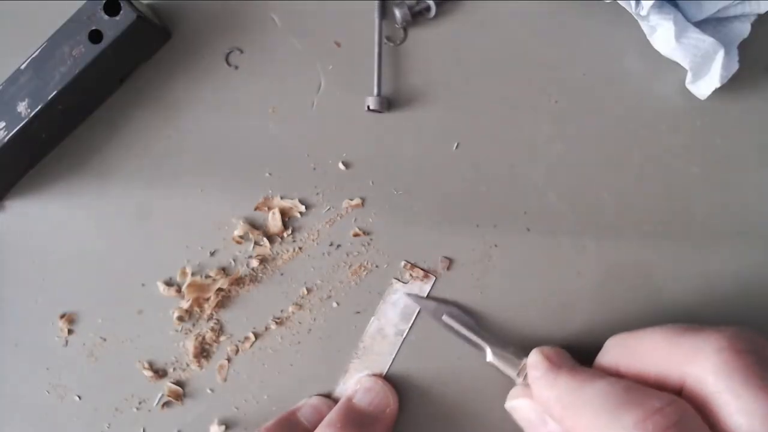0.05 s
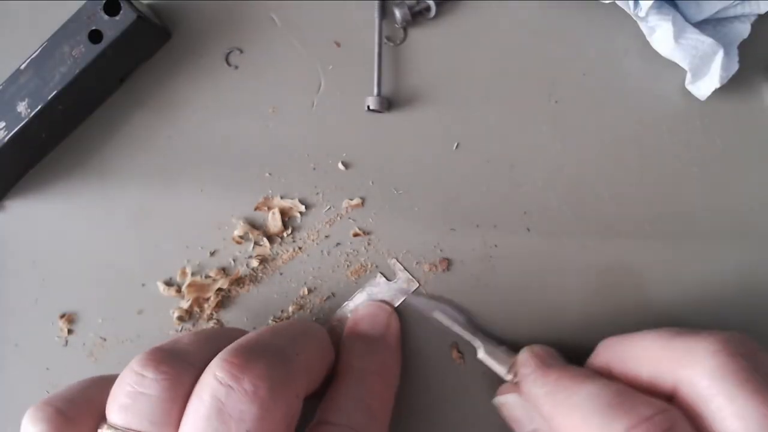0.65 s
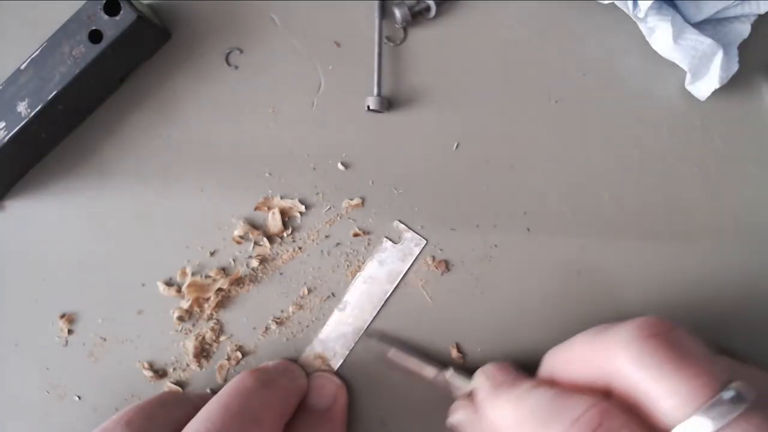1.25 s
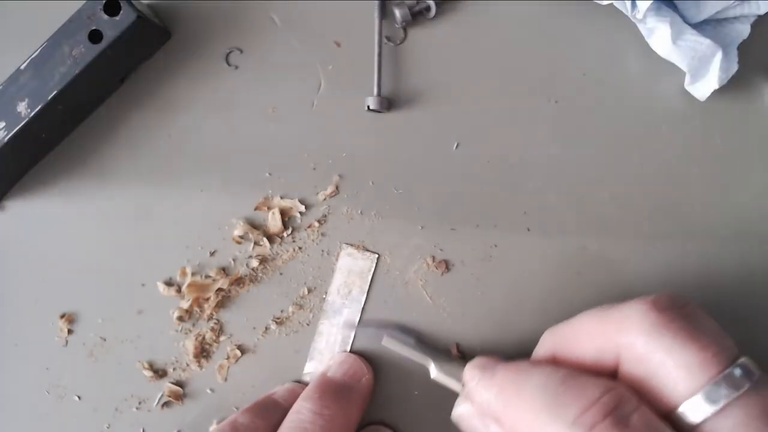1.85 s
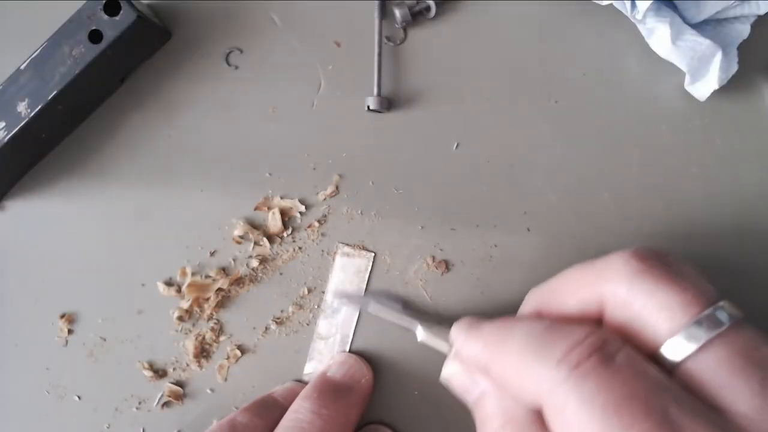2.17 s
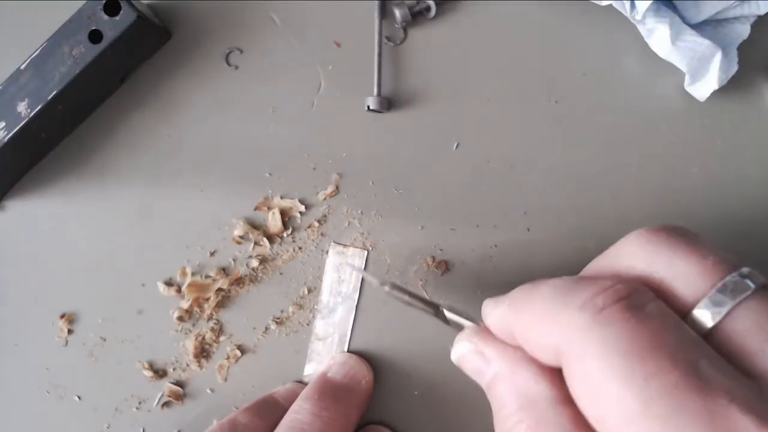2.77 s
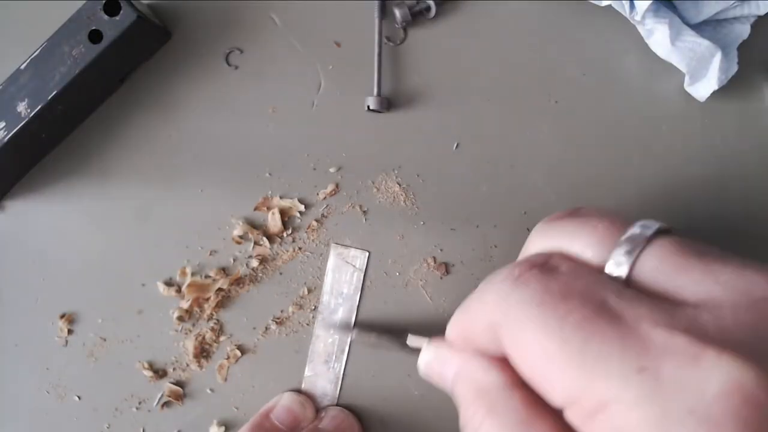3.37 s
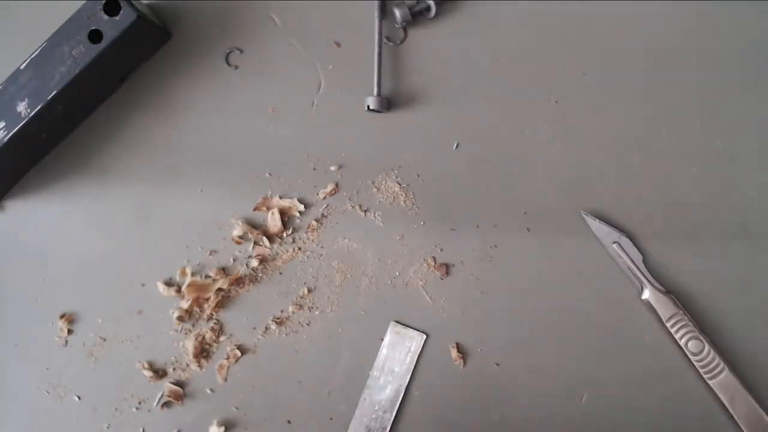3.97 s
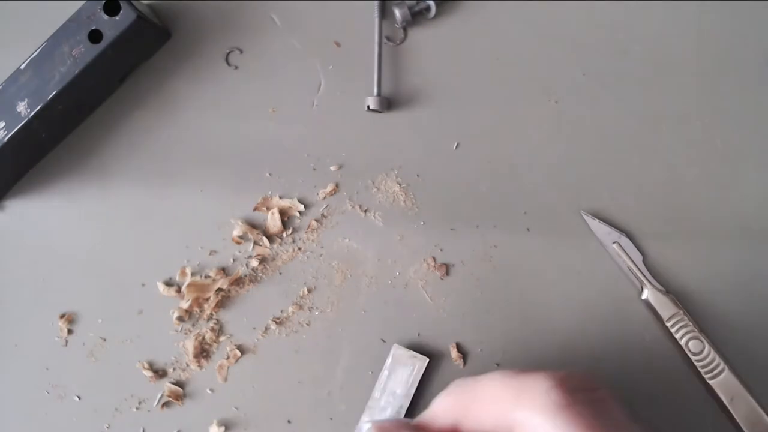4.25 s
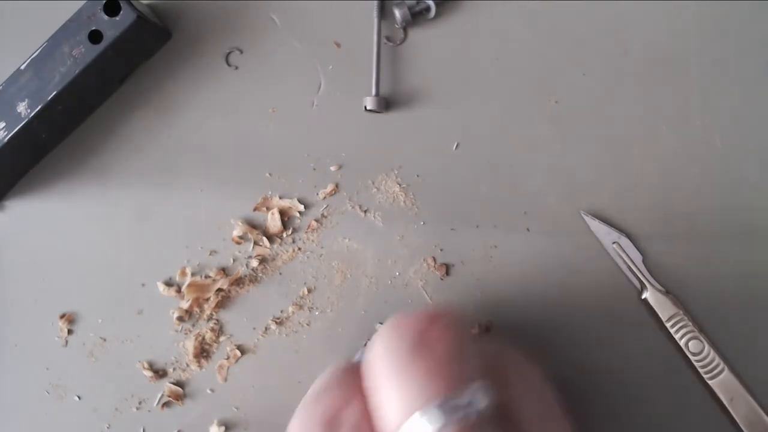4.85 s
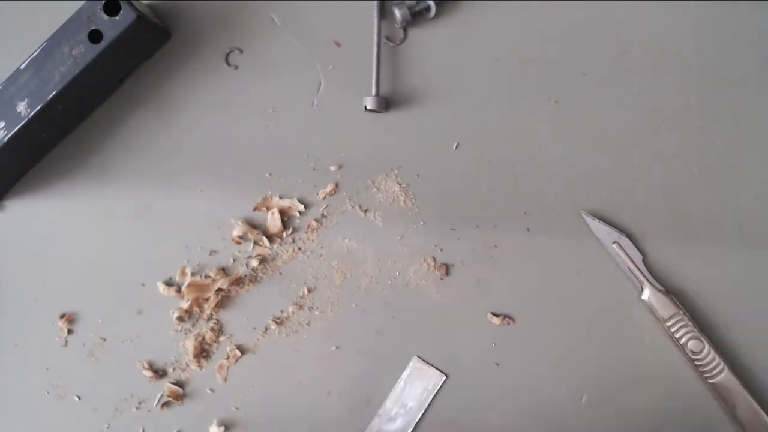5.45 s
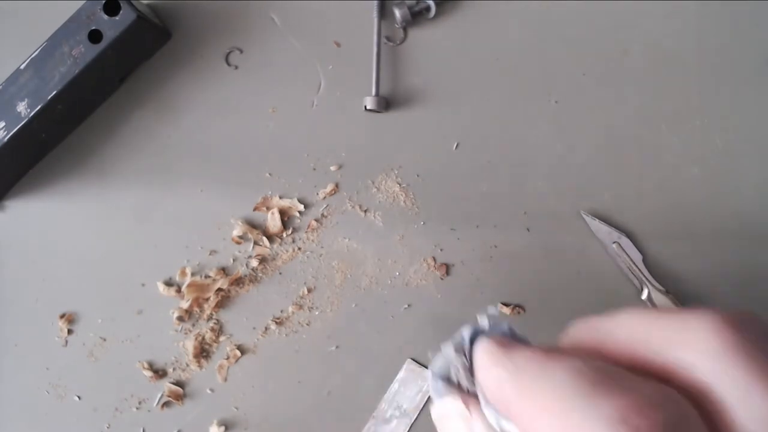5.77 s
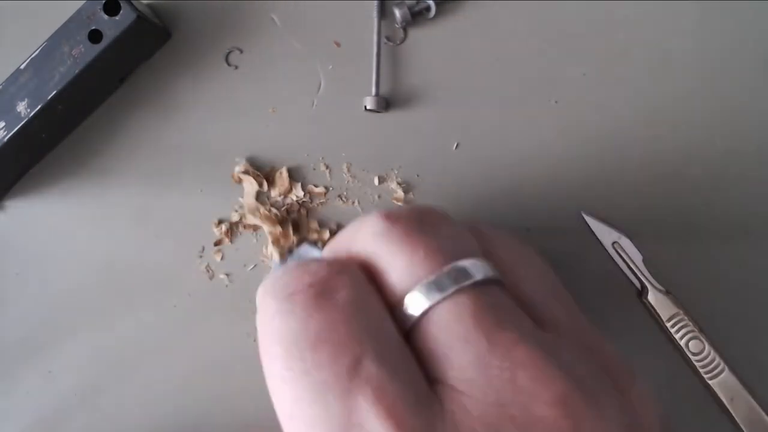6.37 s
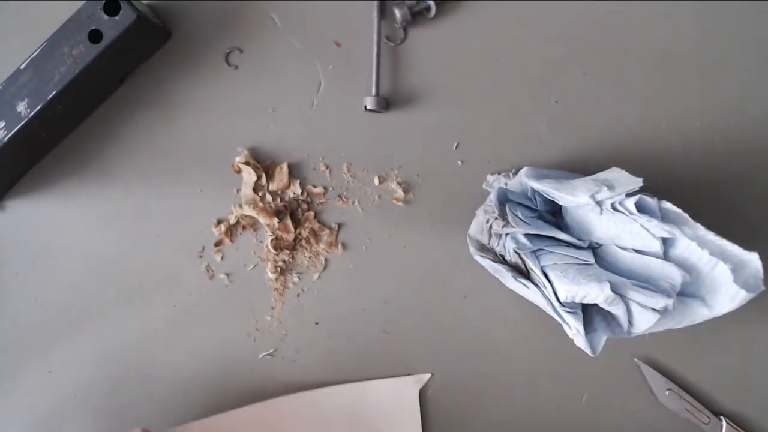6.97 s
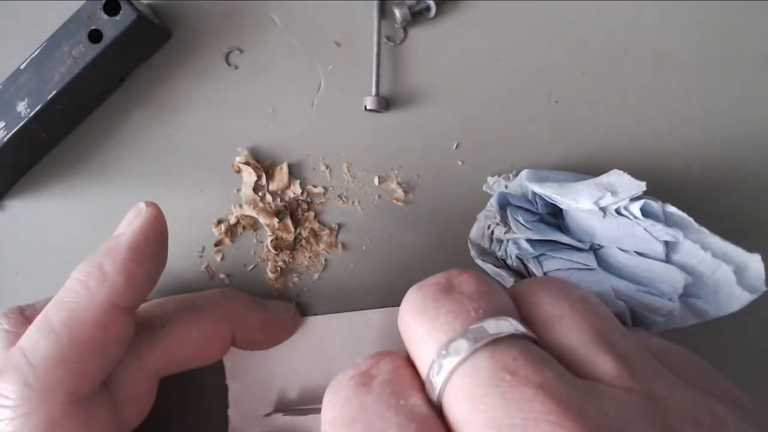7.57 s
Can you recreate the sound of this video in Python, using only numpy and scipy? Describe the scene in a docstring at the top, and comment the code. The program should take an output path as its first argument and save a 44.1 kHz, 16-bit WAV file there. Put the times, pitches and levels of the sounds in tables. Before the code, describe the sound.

A scalpel scrapes and picks at a thin metal strip, metal clatters down, then a paper towel rubs and wipes a bench.

```python
"""Quick bench work, close up in a dry room, hurried as in fast motion.
First a scalpel picks and scrapes a label off a thin metal strip: gritty friction, ticks as the tip snaps free.
Near 3.9 s the scalpel clatters down, at 4.2 s the strip; the bench damps their ring at once.
From 4.4 s a paper towel rubs the strip and sweeps up the shavings. Hands bump the bench throughout."""
import sys
import numpy as np
from scipy import signal
from scipy.io import wavfile
from scipy.ndimage import map_coordinates

SR = 44100
rng = np.random.default_rng(int(sys.argv[2]) if len(sys.argv) > 2 else 0)


def master(y):
    """Save y as 16-bit WAV."""
    cut = np.clip(np.atleast_2d(y).T, -1, 1)
    pcm = np.round(cut * 32767)  # scale
    wavfile.write(sys.argv[1], SR, pcm.astype(np.int16))


N = 340011
TIME_S = np.arange(N) / SR
SHEEN_HZ, CUTOFF_HZ = 8000, 16100  # noise is "body" below SHEEN_HZ, "sheen" above

# Evenly paced strokes; table levels are relative throughout. Each row: first and last stroke in seconds,
# stroke count, start, middle and end level in dB, sheen offset in dB, stroke length in seconds,
# drag offset in dB, bench push in dB.
BLADE_SCRAPE_RUNS = [ (0.0767, .131, 3, -48, -49.5, -46, 3, 0.003, -65, -69),
                     (0.391, .481, 4, -58, -57, -58.5, 3.5, 0.0027, -59, -46.5),
                     (0.682, 0.782, 5, -66, -50.5, -57.5, 4, 0.003, -59, -93),
                     (0.803, 0.931, 7, -47, -50.5, -58.5, 4, .0024, -56, -88),
                     (1.042, 1.345, 14, -54, -41, -45, -5, 0.0053, -10.5, -57.5),
                     (1.617, 1.682, 4, -56.5, -82, -61, -3, 0.018, -20, -59),
                     (1.87, 1.943, 4, -66.5, -53, -57, 1, 0.0039, -20, -78),
                     (1.998, 2.282, 13, -59, -51, -62, 2, 0.0054, -16, -66),
                     (2.354, 2.422, 4, -86, -52.5, -52, 0.5, 0.0019, -61, -79),
                     (2.485, 2.688, 10, -54.5, -55, -54, -0.5, 0.0074, -30, -81),
                     (2.9252, 2.984, 3, -47, -40, -43.5, 1, 0.0051, -50, -65),
                     (3.004, 3.106, 6, -42.5, -45.5, -47, 3.5, 0.0034, -40, -54),
                     (3.206, 3.33, 5, -70, -61, -52, 2.5, 0.0037, -44, -72.5),
                     (3.414, 3.488, 3, -44.5, -45.5, -44.5, -2.5, 0.0071, -48.5, -67),
                     (3.651, 3.838, 6, -48.5, -43.5, -42.5, -1, 0.0076, -59, -75),
                     (3.998, 4.174, 10, -53, -53, -49.5, -0.5, 0.0093, -23, -68.5)]
PAPER_RUB_RUNS = [ (4.393, 4.658, 19, -49, -43.5, -46.5, -0.5, 0.0051, -19, -38),
                  (4.914, 5.163, 20, -50.5, -45.5, -50, -1, 0.0045, -18.5, -38),
                  (5.173, 5.261, 8, -51.5, -61, -61.5, 6, 0.0023, -27, -69),
                  (5.624, 5.868, 17, -49.5, -46.5, -49, 1.5, 0.005, -20, -51)]
# Lone strokes. Each row: middle in seconds, level in dB, sheen offset in dB, length in seconds.
LONE_SCRAPES = [(.02, -57, -3, 0.0022), (.0535, -68, 3, 0.0017), (.1846, -64, 22, 0.0025),
                (.27, -72, 9, .0025), (.315, -64, 9, .004), (.6297, -61, -4, 0.01),
                (1.468, -63, -0.5, .0016), (1.765, -65, -7, 0.0018), (2.7577, -68.5, 14.5, 0.0014),
                (2.7807, -59, 8, 0.0014), (2.8444, -52, 3, 0.0017), (3.5179, -51, 6.5, 0.0084),
                (3.5432, -51, 6.5, 0.0051), (3.8815, -48, 7, 0.002), (3.9375, -53.5, 6, 0.0058),
                (4.199, -62.5, 11, 0.008), (4.288, -50, 1, 0.0078), (4.3431, -49, -3.5, 0.0039)]
LONE_WIPES = [(4.81, -66, 2.5, 0.008), (5.3494, -53, 3, 0.0066), (5.3894, -45.5, 3, 0.0066),
              (5.4479, -53, 3, 0.0019), (5.5203, -60.5, 1, 0.0083), (5.9484, -57.5, -4, 0.0049),
              (5.9791, -64, 2, .002), (6.0335, -48, -11, 0.0014), (6.1339, -59, 4, 0.0038),
              (6.064, -52, -1.5, 0.01), (6.1578, -57, 1.5, 0.014), (6.2158, -52.5, -2, 0.013),
              (6.2874, -59, -1, 0.011), (6.3717, -60.5, -2, .01), (6.4344, -62.5, -2, 0.0088),
              (6.4877, -61.5, -0.5, 0.013), (6.6006, -49.5, 0, 0.0017), (6.6326, -55, -2.5, 0.012),
              (6.8916, -56.5, 4.5, 0.0048), (6.9491, -64.5, 0, 0.015), (7.025, -68, 6.5, .0028),
              (7.33, -69.5, -4, 0.012)]
# Hard contacts. Each row: start in seconds, level in dB, sheen offset in dB.
SHARP_TICKS = [(.1649, -44.5, -2), (.1947, -34, 10.5), (.2585, -53.5, -3), (.4491, -46.5, 5),
               (.5905, -46.5, 11), (.7548, -56.5, 22.5), (.8007, -52.5, 14.5), (.8293, -47, 0),
               (.845, -52, 5), (.888, -55, 19), (1.0267, -51.5, 5), (1.3184, -37, -3), (1.3442, -39.5, 2),
               (1.3643, -46.5, 2.5), (1.6252, -48.5, 12), (1.9191, -49.5, 4), (2.5285, -42, 5),
               (2.9568, -41, 3), (3.0033, -43, 11), (3.0456, -50, 4), (3.0844, -53, 12), (3.1035, -35, 1),
               (3.2024, -46, 2), (3.3265, -60.5, 15.5), (4.7756, -50.5, -12.5), (5.6116, -49, -6),
               (5.7178, -46, -5), (5.7463, -46, 9.5), (6.8845, -72.5, -5), (7.2025, -69, -22),
               (7.274, -56.5, 4.5)]
STRIP_KNOCKS = [(.1947, -41, 4.5), (1.6024, -36, 3.5)]
SCALPEL_HITS = [(.5414, -41, 0.5), (3.8828, -35, 3), (3.8928, -31, -19), (3.8948, -26, 2.5)]
STRIP_HITS = [(4.2032, -34.5, 20), (4.2065, -23.5, 6.5), (4.2094, -23.5, -20), (4.2703, -44.5, 13.5),
              (4.2736, -32.5, 6.5)]
# A hand lands or shifts on the bench. Each row: time in seconds, jostle length in seconds, level in dB.
HAND_BUMPS = [(0.326, 0.00017, -49), (.44, .068, -47), (1.335, .045, -54), (1.605, 0.00017, -50),
              (1.742, 0.002, -53), (1.983, 0.00075, -46), (2.224, 0.00022, -51.5), (2.434, .03, -36),
              (2.659, .026, -34), (2.742, .013, -36.5), (3.069, .036, -39.5), (3.145, 0.00037, -41),
              (3.188, 0, -44), (3.27, 0, -49.5), (3.512, .03, -44), (3.78, .036, -47), (4.293, .034, -51.5),
              (5.35, 0.00055, -37.5), (5.385, 0, -35.5), (5.417, 0.00091, -39), (5.478, 0.002, -40),
              (5.533, .03, -40.5), (5.616, 0, -41.5), (6.049, 0.0057, -39.5), (6.119, .014, -41.5),
              (6.197, 0, -46), (6.258, 0.009, -40.5), (6.293, 0, -46), (6.436, 0.0055, -43.5),
              (6.559, .078, -50.5), (6.776, .013, -40), (6.841, .02, -48.5), (7.246, 0.00059, -48),
              (7.423, 0.0076, -54.5), (7.685, 0.0048, -46)]
# Finger activity curve. Each row: time in seconds, rustle level in dB, nudge level in dB.
FIDGET_CURVE = [(0, -73.5, -80), (0.221, -76, -80.5), (.5, -77, -50), (.66, -88.5, -78),
                (1.101, -94.5, -65), (1.53, -88.5, -75.5), (1.8, -87.5, -57.5), (2.15, -77.5, -58),
                (2.7, -66.5, -60), (2.9, -93, -59), (3.6, -97, -71), (4.299, -85, -64), (4.74, -84.5, -63),
                (5.25, -74, -60.5), (5.899, -82, -58.5), (6.55, -69.5, -55.5), (6.72, -93.5, -55),
                (7.7, -95.5, -59.5)]
# Struck modes. Each row: frequency in Hz, level in dB, T60 in seconds.
SCALPEL_RING_MODES = [(1154, -15.5, 0.041), (1884, -11, 0.015), (2950, -10, 0.0091), (3430, -26, 0.016),
                      (4630, -1.5, 0.0156), (5170, -7, 0.01), (15540, -6, 0.0186), (14900, -24.5, .017)]
STRIP_RING_MODES = [(1964, -20.5, .018), (2160, -12.5, .017), (5070, -19.5, 0.011), (5400, -23.5, 0.016),
                    (6912, 1.5, 0.023), (8200, -14, 0.028), (7600, -13.5, 0.017), (10550, -13, .022),
                    (10200, -9, 0.014), (9800, -18, .02)]
BENCH_THUD_MODES = [(67, -1, 0.038), (107, -8.5, 0.039), (182, -9.5, 0.033), (288, -19, 0.034),
                    (350.4, -24.5, 0.02), (450, -25.5, 0.054), (1180, -35, 0.035)]
# Resonances of the working blade. Each row: centre in Hz, width in Hz, gain in dB.
BLADE_PEAKS = [(4530, 150, -6.5), (5730, 330, -12), (7230, 1900, -5.5), (10660, 350, 6.5),
               (13200, 410, -3.5)]
# Noise spectra. Each row: frequency in Hz, spectral density in dB.
BLADE_SPECTRUM = [(60, -1), (150, 6), (400, -0.5), (800, 0), (1600, 2.5), (2600, 0.5), (3800, 4.5),
                  (4800, 5), (7000, -1), (9300, -4), (11000, -5.5), (13000, 1), (15800, -3)]
PAPER_SPECTRUM = [(60, 9.5), (200, 4.5), (650, -4.5), (1150, 1.5), (1600, -1.5), (2050, 0.5), (2600, 0),
                  (4000, -2.5), (5400, 1.5), (9500, -4.5), (12000, 0.5), (15800, -5)]
TICK_SPECTRUM = [(60, 9), (300, 13.5), (700, 3), (1100, -16), (1800, 11), (3500, 1), (5200, 7), (7000, -2),
                 (9500, -10), (12000, -12.5), (15800, 1.5)]
STEEL_SPECTRUM = [(60, -13.5), (400, -11.5), (1500, -20), (2100, 7.5), (4000, -5.5), (5300, 6), (8200, 1),
                  (9900, -2.5), (11200, -8), (14800, -5), (15800, -1.5)]
KNOCK_SPECTRUM = [(60, 18.5), (300, 15.5), (550, 10), (1000, -28), (2200, 8), (3800, -1), (8000, -6.5),
                  (11500, -1.5), (15800, 1.5)]
RUSTLE_SPECTRUM = [(60, 8), (400, -1.5), (1200, -1.5), (3000, -1), (7000, -1), (12000, 2), (15800, -6.5)]
ROOM_SPECTRUM = [(20, 11.5), (70, -5), (150, -9), (300, -18), (700, -34), (2000, -35.5), (6000, -42),
                 (15800, -42.5)]


def blade():
    """The edge drags over glue and metal."""
    power = stroke_power(LONE_SCRAPES) + run_power(BLADE_SCRAPE_RUNS, hard_edge=True)
    return from_db(-0.5) * friction(power, BLADE_SPECTRUM, grit_db=4, grit_s=.0006, peaks=BLADE_PEAKS)


def paper():
    """Soft fibres rub more evenly than steel."""
    power = stroke_power(LONE_WIPES) + run_power(PAPER_RUB_RUNS, hard_edge=False)
    return from_db(-1) * friction(power, PAPER_SPECTRUM, grit_db=3, grit_s=.0007)


def friction(power, spectrum, grit_db, grit_s, peaks=()):
    """Countless tiny slips make a gritty hiss and excite the tool's resonances."""
    bands = np.array(noise_bands(spectrum))
    body, sheen = bands + resonate(bands, peaks)
    hiss = np.sqrt(power[0]) * unit_rms(body) + np.sqrt(power[1]) * unit_rms(sheen)
    grains = np.clip(rng.standard_normal(N // 4), -2, 2)
    flicker_db = grit_db * np.interp(TIME_S / grit_s, np.arange(len(grains)), grains)
    return unit_rms(from_db(flicker_db)) * hiss


def stroke_power(strokes):
    """Friction power (body, sheen): each stroke swells and fades as the hand speeds up and stops."""
    power = np.zeros((2, N))
    t = np.arange(-SR // 40, SR // 40) / SR
    for middle_s, db, sheen_db, length_s in strokes:
        swell = .5 ** ((2 * t / length_s) ** 2)
        add(power[0], middle_s + t[0], from_db(db) ** 2 * swell)
        add(power[1], middle_s + t[0], from_db(db + sheen_db) ** 2 * swell)
    return power


def run_power(runs, hard_edge):
    """Friction power (body, sheen) of runs: evenly paced strokes over the tool's light drag."""
    strokes, drag = [], np.zeros((2, N))
    for first_s, last_s, count, *effort_db, run_sheen_db, length_s, drag_db, _ in runs:
        along = np.linspace(0, 1, count)
        times_s = first_s + along * (last_s - first_s)
        effort_curve = np.polyfit([0, .5, 1], effort_db, 2)
        scatter_db = rng.uniform(-1, 1, (count, 2))
        body_db = np.polyval(effort_curve, along) + scatter_db[:, 0]
        sheen_db = run_sheen_db + scatter_db[:, 1]
        strokes += zip(times_s, body_db, sheen_db, [length_s] * count)
        t = np.arange(first_s, times_s[-1], 1 / SR)
        for band, band_db in zip(drag, (body_db, body_db + sheen_db)):
            add(band, first_s, np.interp(t, times_s, from_db(band_db + drag_db) ** 2))
    if hard_edge:  # touches down for 1 ms just before each swell
        strokes += [(middle_s - 1.3 * length_s, db - 9, sheen_db, .001)
                    for middle_s, db, sheen_db, length_s in strokes]
    return stroke_power(strokes) + drag


def sharp_ticks(crack_db, ring_db):
    """The tip snaps free, the strip taps, or a wipe gives a brief sharp burst: a short crack sets the blade
    ringing."""
    cracks = contacts(SHARP_TICKS, TICK_SPECTRUM, crack_t60_s=.0046, tail_db=-17, tail_t60_s=.025)
    return from_db(crack_db) * cracks + from_db(ring_db) * resonate(cracks, BLADE_PEAKS)


def steel_clatter(hits, modes, crack_db, ring_db):
    """Steel chatters on the bench, which damps its ring at once."""
    cracks = contacts(hits, STEEL_SPECTRUM, crack_t60_s=.014, tail_db=-30.5, tail_t60_s=.022)
    out = from_db(crack_db) * cracks
    for start_s, db, _ in hits:
        add(out, start_s, from_db(db + ring_db) * strike(modes, scatter_db=1.5, detune=.004))
    return out


def strip_knocks():
    """The strip knocks dully on the bench top."""
    return contacts(STRIP_KNOCKS, KNOCK_SPECTRUM, crack_t60_s=.012, tail_db=-29, tail_t60_s=.02)


def contacts(events, spectrum, crack_t60_s, tail_db, tail_t60_s):
    """Each hard contact is a sharp crack with a short, weaker tail."""
    body, sheen = noise_bands(spectrum, size=SR)
    t, out = TIME_S[:SR // 16], np.zeros(N)
    decay = from_db(-60 * t / crack_t60_s) + from_db(tail_db - 60 * t / tail_t60_s)
    for start_s, db, sheen_db in events:
        for band, band_db in ((body, db), (sheen, db + sheen_db)):
            offset = rng.integers(SR - len(t))
            burst = band[offset:offset + len(t)] * decay
            attack_rms = np.std(burst[:SR // 500])
            add(out, start_s, from_db(band_db) * burst / attack_rms)
    return out


def strike(modes, scatter_db, detune):
    """One blow on a set of modes; strength and pitch vary at random, as with a changing grip."""
    t, out = TIME_S[:SR // 16], 0
    for hz, db, t60_s in modes:
        envelope = from_db(db + scatter_db * rng.standard_normal() - 60 * t / t60_s)
        detuned_hz = hz * (1 + detune * rng.standard_normal())
        out += envelope * np.sin(2 * np.pi * detuned_hz * t)
    return out


def resonate(drive, peaks):
    """What a tool's resonances add to the sound that excites them."""
    return sum(from_db(db) * signal.lfilter(*signal.iirpeak(hz, hz / width_hz, SR), drive)
               for hz, width_hz, db in peaks)


def bench_thuds(lead_s, press_s, bump_db, rub_db, jostle_s):
    """Soft pushes set the bench thudding: bumps, small nudges and each stroke of a run."""
    pushes = [(time_s + after_s, db + bump_db) for time_s, length_s, db in HAND_BUMPS
              for after_s in np.linspace(0, length_s, 1 + round(length_s / jostle_s))]
    pushes += fidgets(column=2, count=200, scatter_db=7)
    for first_s, last_s, count, *_, push_db in BLADE_SCRAPE_RUNS + PAPER_RUB_RUNS:
        along = np.linspace(0, 1, count)
        lean_db = 8 * (along - .5)  # the hand leans in over the run
        return_db = -9 * (np.arange(count)[::-1] % 2)  # return strokes push less
        levels_db = push_db + rub_db + lean_db + return_db + rng.uniform(-2.5, 2.5, count)
        pushes += zip(first_s + along * (last_s - first_s), levels_db)
    out = np.zeros(N)
    for time_s, db in pushes:
        thud = strike(BENCH_THUD_MODES, scatter_db=5, detune=.09)
        onset = np.tanh(TIME_S[:len(thud)] / press_s)  # flesh yields
        add(out, time_s - lead_s, from_db(db) * thud * onset)
    return signal.sosfilt(signal.butter(1, 22, "high", fs=SR, output="sos"), out)


def rustles(gain_db, length_s):
    """Crumbs and fingertips add faint rustles, some dull, some bright."""
    touches = [(time_s, db + gain_db, rng.normal(-2.5, 3.4), length_s)
               for time_s, db in fidgets(column=1, count=220, scatter_db=5)]
    return friction(stroke_power(touches), RUSTLE_SPECTRUM, grit_db=2.5, grit_s=.0007)


def fidgets(column, count, scatter_db):
    """Small unplanned touches as (seconds, dB) pairs."""
    times_s = (np.arange(count) + rng.random(count)) / count * TIME_S[-1]
    curve = np.transpose(FIDGET_CURVE)
    levels_db = np.interp(times_s, curve[0], curve[column]) + scatter_db * rng.uniform(-1, 1, count)
    return zip(times_s, levels_db)


def room_reflections(direct, wet_db, t60_s):
    """Direct sound plus a faint, quick wash of reflections."""
    t = TIME_S[:SR // 8]
    wash = rng.standard_normal(len(t)) * from_db(-60 * t / t60_s) * (t > .001)
    return direct + from_db(wet_db) * signal.fftconvolve(direct, wash / np.linalg.norm(wash))[:N]


def room_tone(level_db):
    """Faint, low background noise."""
    return from_db(level_db) * unit_rms(sum(noise_bands(ROOM_SPECTRUM)))


def noise_bands(spectrum, size=N, patch_db=3.5):
    """Shaped noise as (body, sheen); its colour wanders, as when a contact point moves."""
    hz, _, cells = signal.stft(rng.standard_normal(size), SR, nperseg=1024)
    points_hz, points_db = np.transpose(spectrum)
    shape_db = np.interp(np.log(hz + 1), np.log(points_hz), points_db)
    frames = cells.shape[1]
    grid = np.meshgrid(5 * np.log1p(hz / 1000), np.arange(frames), indexing="ij")
    patches = map_coordinates(rng.standard_normal((20, frames)), grid, order=1)
    cells *= from_db(shape_db[:, None] + patch_db * patches)
    return [signal.istft(cells * band[:, None], SR)[1][:size] for band in (hz < SHEEN_HZ, hz >= SHEEN_HZ)]


def from_db(db):
    return 10 ** (np.asarray(db) / 20)


def unit_rms(x):
    return x / np.sqrt(np.mean(x ** 2) + 1e-20)


def add(track, start_s, sound):
    at = int(np.clip(round(start_s * SR), 0, N - 1))
    track[at:at + len(sound)] += sound[:N - at]


def scene():
    """Mono mix; thuds and room tone bypass the reflections."""
    ticks = sharp_ticks(crack_db=-1.5, ring_db=-1)
    knocks = strip_knocks()
    scalpel = steel_clatter(SCALPEL_HITS, SCALPEL_RING_MODES, crack_db=-5.5, ring_db=1)
    strip = steel_clatter(STRIP_HITS, STRIP_RING_MODES, crack_db=-2.5, ring_db=-11)
    thuds = bench_thuds(lead_s=.0072, press_s=.0034, bump_db=6.5, rub_db=3.5, jostle_s=.015)
    air = room_tone(level_db=-90)
    rubbing = blade() + paper() + rustles(gain_db=4, length_s=.0044)
    direct = rubbing + ticks + knocks + scalpel + strip
    return (room_reflections(direct, wet_db=-22.5, t60_s=.033) + thuds + air)[None]


def record(dry):
    """Steep low-pass on the top treble."""
    return signal.sosfilt(signal.ellip(10, .2, 70, CUTOFF_HZ, fs=SR, output="sos"), dry)


dry = scene()
out = record(dry)
master(out)
```